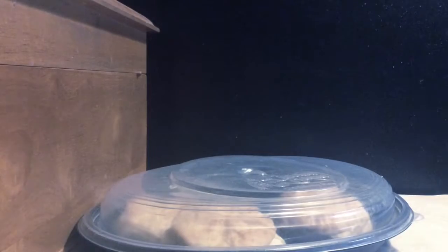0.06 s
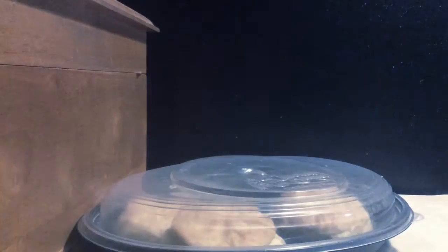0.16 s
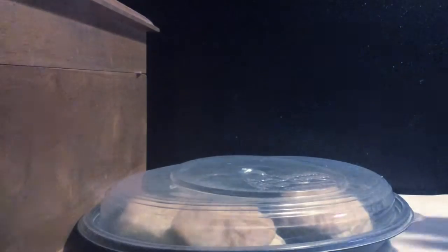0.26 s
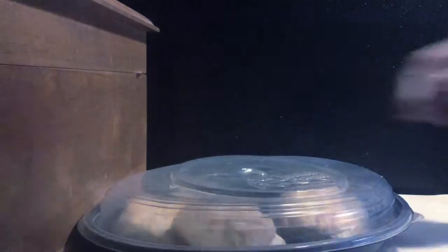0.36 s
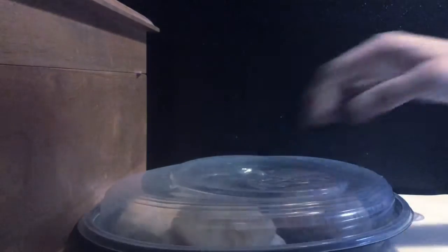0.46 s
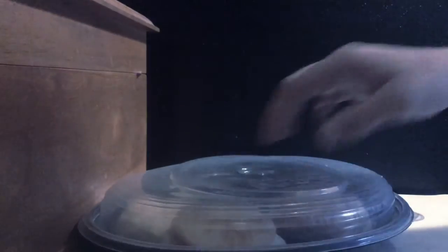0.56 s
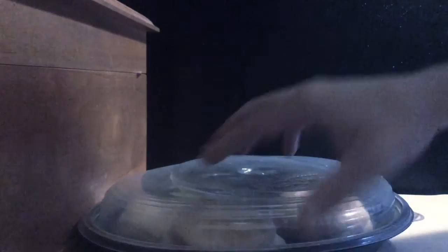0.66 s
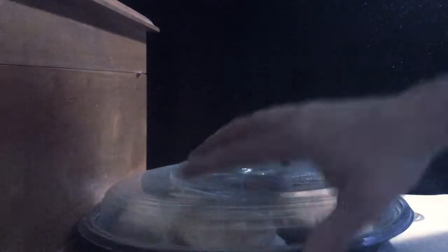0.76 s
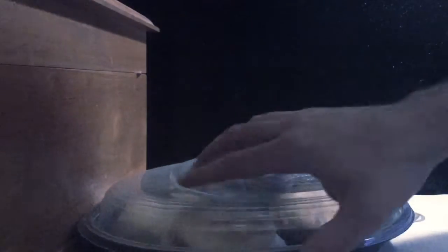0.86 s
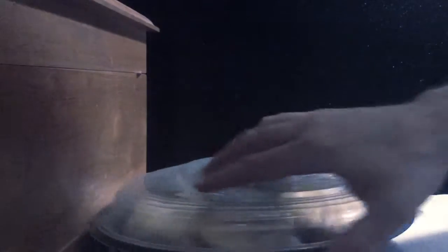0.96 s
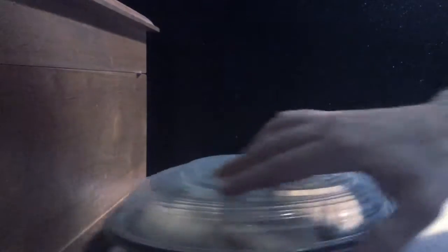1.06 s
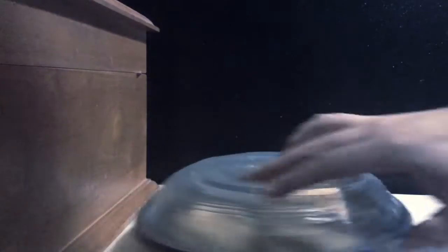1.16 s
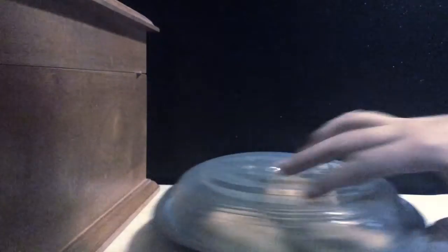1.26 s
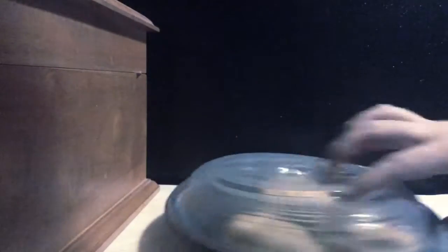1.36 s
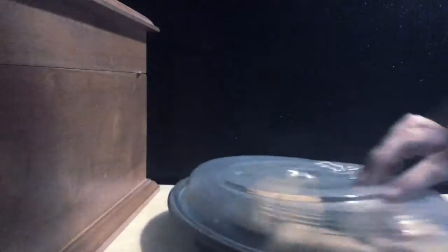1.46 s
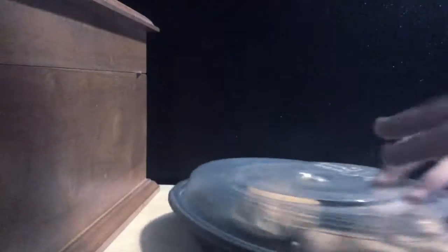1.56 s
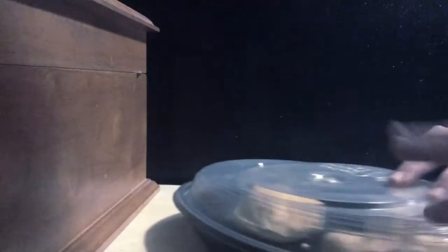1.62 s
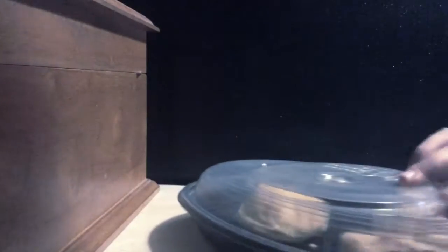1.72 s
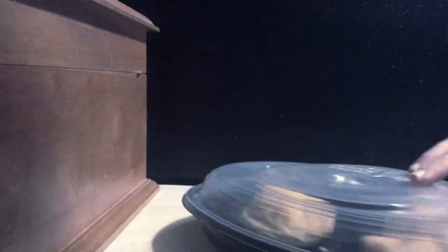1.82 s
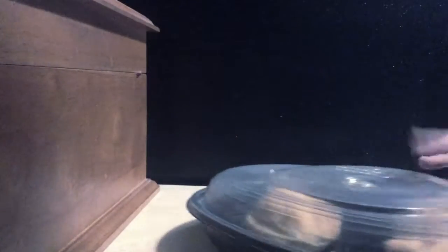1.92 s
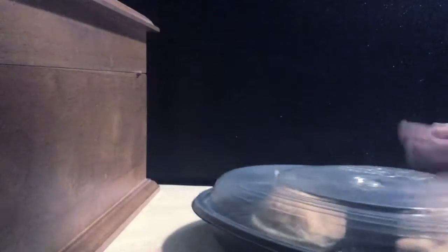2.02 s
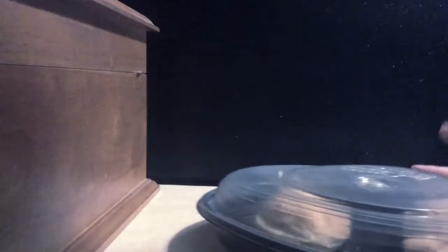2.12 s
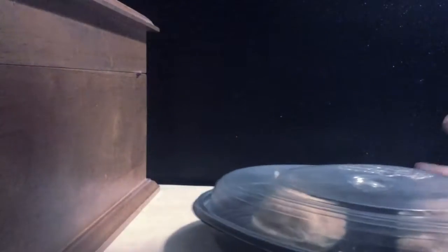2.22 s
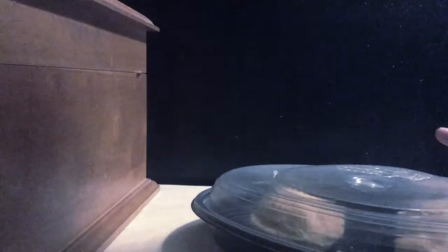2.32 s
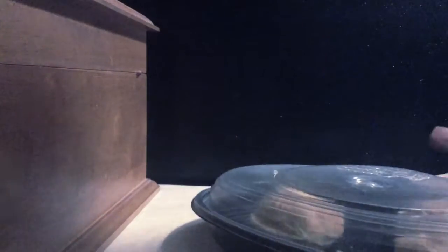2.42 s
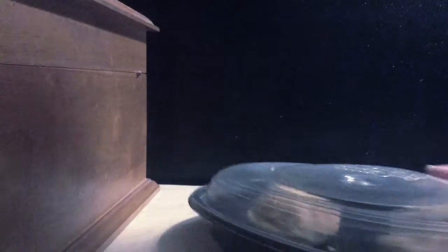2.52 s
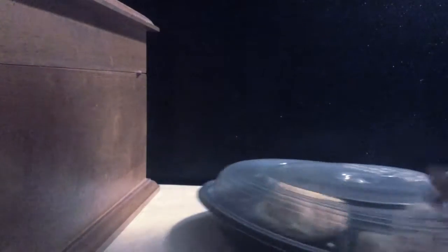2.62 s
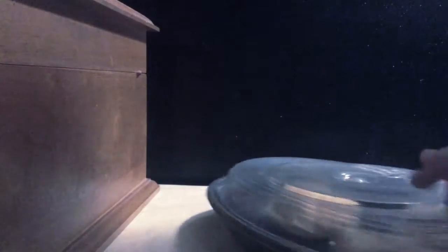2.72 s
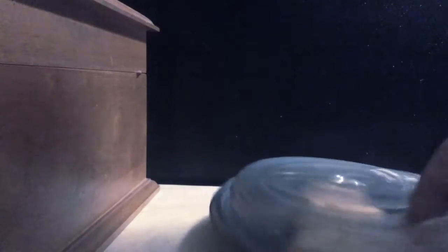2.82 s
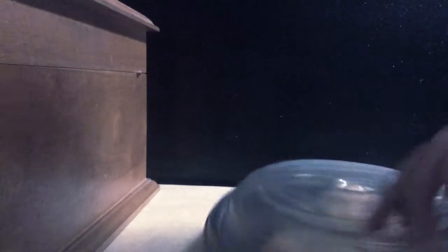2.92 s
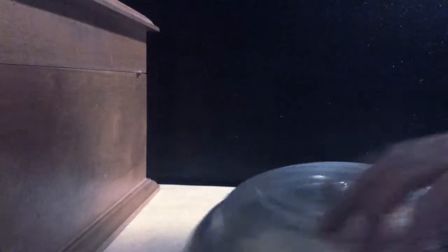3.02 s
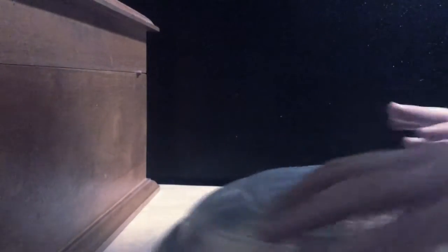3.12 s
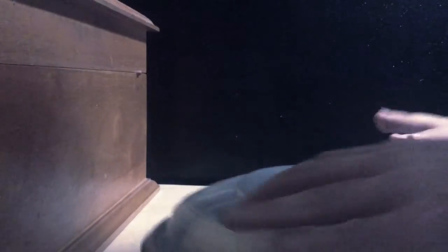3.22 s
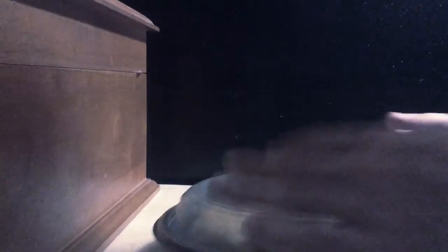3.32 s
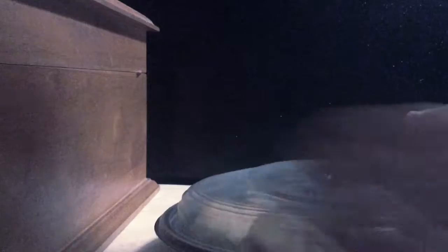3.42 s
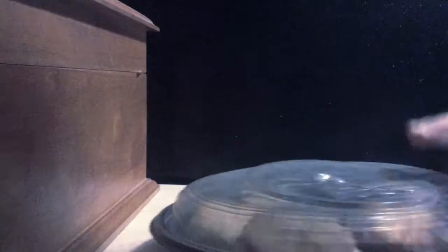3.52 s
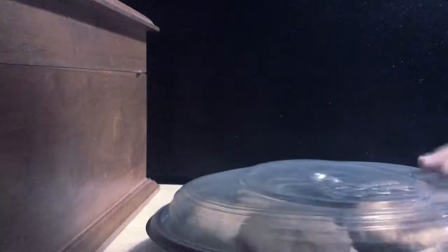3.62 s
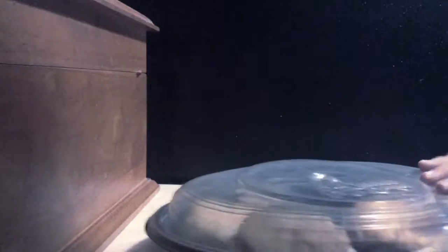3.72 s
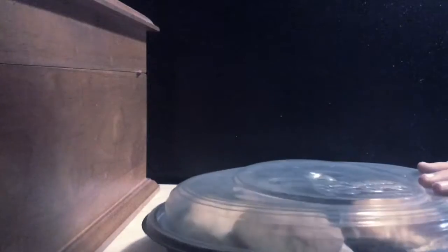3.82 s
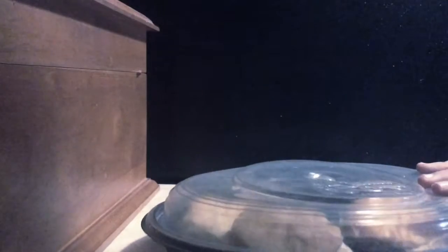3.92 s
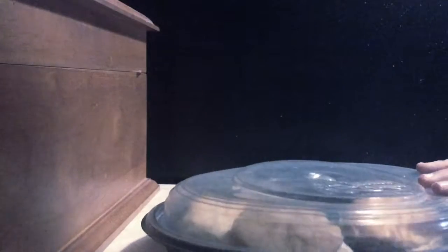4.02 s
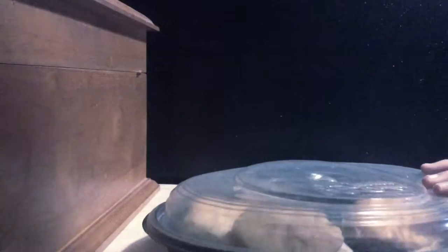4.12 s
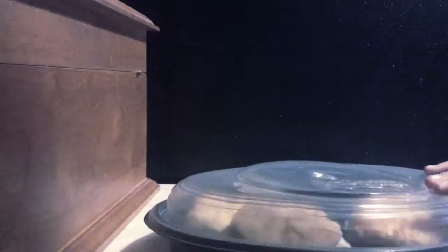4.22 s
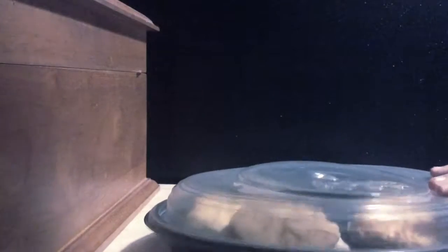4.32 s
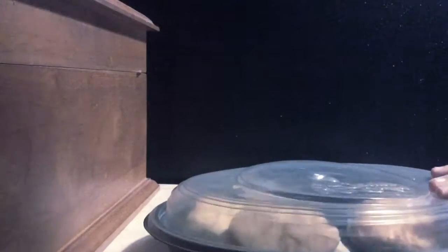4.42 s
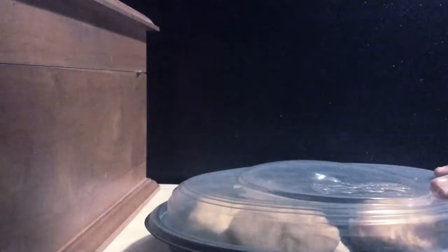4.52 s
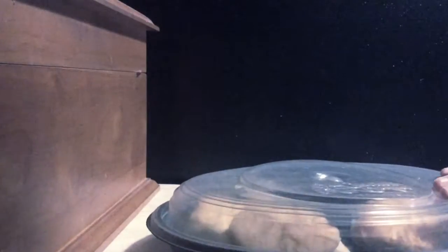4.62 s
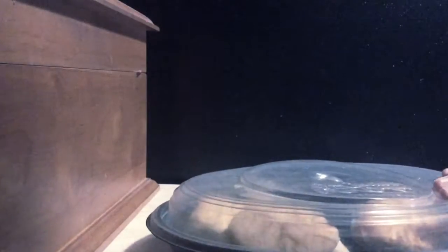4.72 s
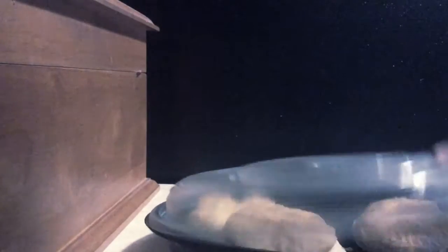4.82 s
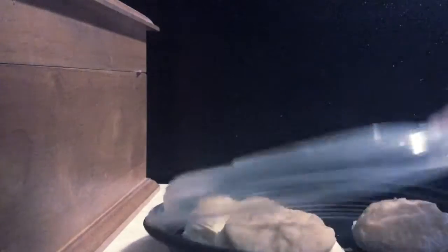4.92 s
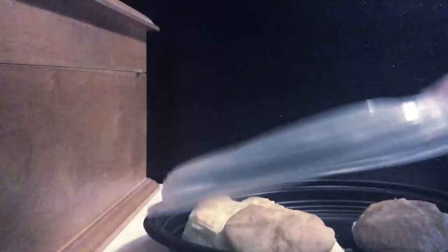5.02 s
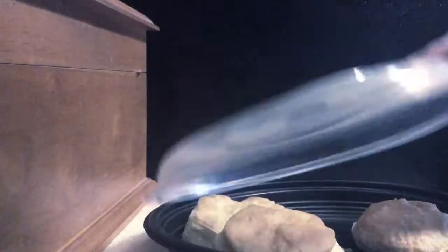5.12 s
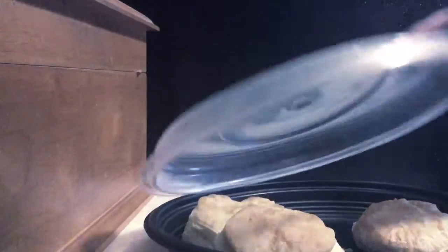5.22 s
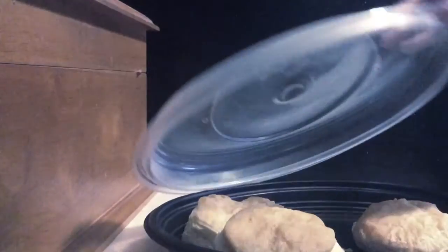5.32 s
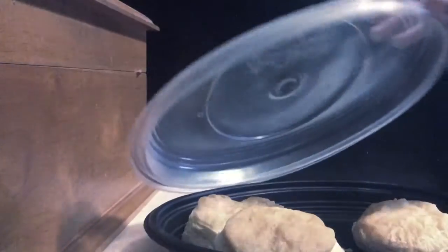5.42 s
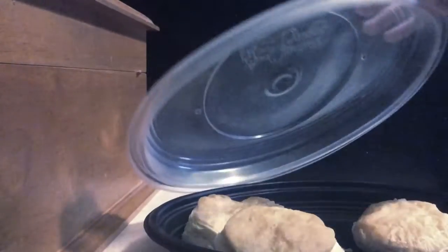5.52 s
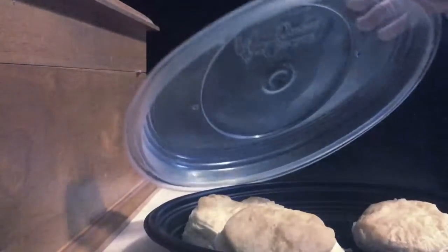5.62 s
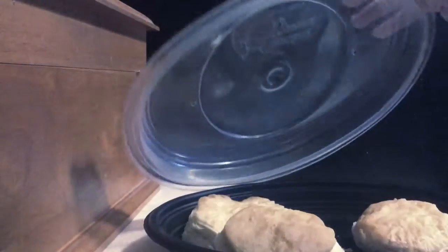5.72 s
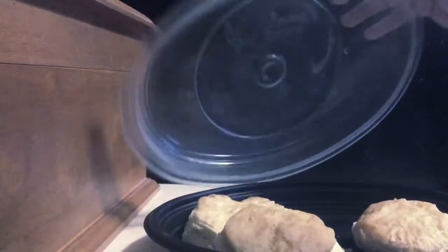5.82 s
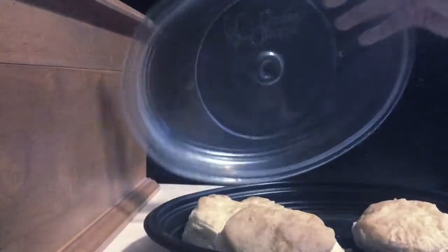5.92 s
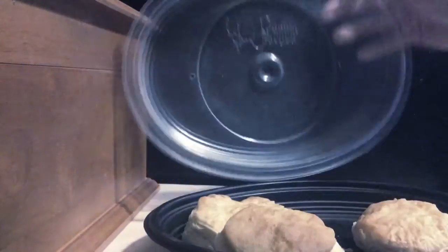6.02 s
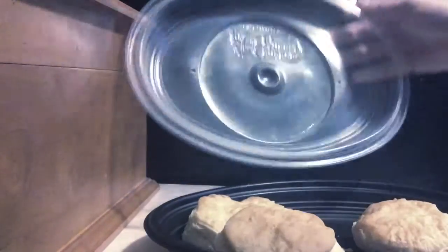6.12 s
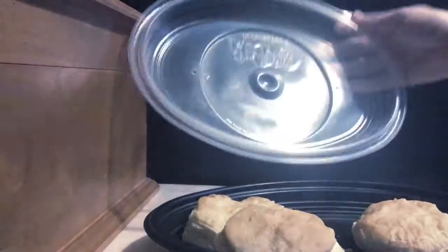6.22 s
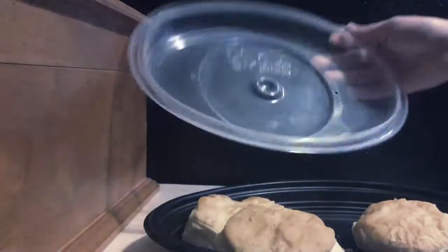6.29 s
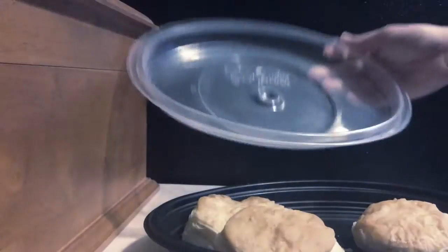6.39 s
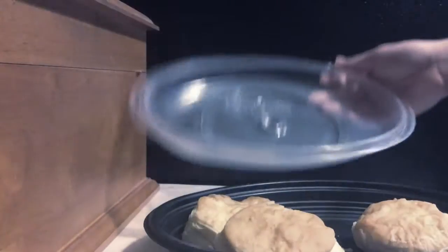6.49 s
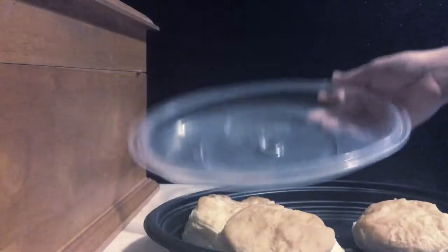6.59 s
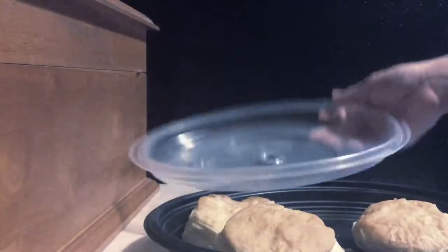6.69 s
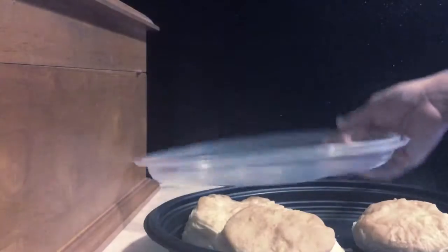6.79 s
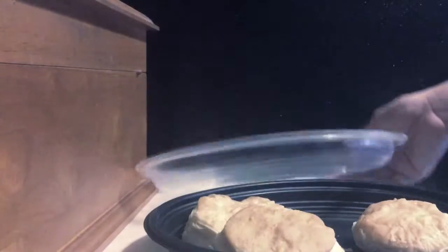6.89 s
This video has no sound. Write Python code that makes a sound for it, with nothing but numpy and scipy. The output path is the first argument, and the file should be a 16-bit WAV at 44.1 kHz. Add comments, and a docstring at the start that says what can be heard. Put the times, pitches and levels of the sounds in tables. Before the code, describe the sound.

A thin plastic tray with a dome lid slides and scrapes over a worktop, knocks and clicks, then pops open above a low room hum.

```python
"""On a worktop in a quiet humming room, close to the microphone: a plastic tray with a thin dome lid.
It is slid about and prised open. Sliding and rubbing are random micro-slips: they hiss in the treble
and shake the plastic's resonances below. The buckling dome knocks as a bank of decaying modes,
creases and rim tick as short cracks of noise, and the bumped board thumps at two low modes.
The hum is noise gathered in low room resonances; a short dull reverberation follows the hits."""
import sys
import numpy as np
from scipy import signal
from scipy.fft import rfft, irfft, next_fast_len
from scipy.io import wavfile

SR = 44100
rng = np.random.default_rng(int(sys.argv[2]) if len(sys.argv) > 2 else 0)


def generate_wav(signal):
    """Clip the signal to [-1, 1] and save it as 16-bit WAV at the path in sys.argv[1]."""
    frames = np.transpose(np.atleast_2d(signal))
    scaled = np.clip(frames, -1, 1) * 32767
    pcm = np.round(scaled).astype(np.int16)
    wavfile.write(sys.argv[1], SR, pcm)


N = 306495  # samples

# Levels are those of the sources, ahead of room and microphone.
# room resonances in the hum: [f/Hz, width of the first of two passes/Hz, rms level/dB]
HUM_RESONANCES = [(59, 12, -71.5), (105.2, 9.8, -67), (152.8, 6.5, -66.5), (169.5, 15.5, -64),
                  (193.5, 36, -70.5), (220.5, 10.3, -63), (346.8, 35, -71.5), (430.5, 22, -75),
                  (1550, 140, -81.5)]
# spectrum of the room's air noise: [f/Hz, relative level/dB]
AIR_SPECTRUM = [(15, -52), (25, -31), (46, -38), (107, -4), (130, -12.5), (159, -7), (218, 0), (266, -26),
                (340, -16.5), (700, -22.5), (1300, -34.5), (2500, -42.5), (9000, -46), (12500, -48.5),
                (15600, -65)]
# the worktop is bumped: [t/s, peak level/dB, f/Hz, t60/s, deep mode relative to the other/dB]
BOARD_THUMPS = [(0.848, -45.5, 161, 0.17, -11), (2.553, -36.5, 162, 0.048, -14),
                (3.163, -42, 111, 0.055, -20), (4.846, -34, 156, 0.068, -7),
                (6.665, -34.5, 104, 0.19, -6.5)]
# faint rustle of the hand between strokes: [t/s, hiss level/dB]
HAND_RUSTLE = [(0, -91), (0.2, -89), (0.43, -80), (0.64, -96), (0.8, -88), (4.7, -93), (5.1, -92),
               (5.58, -77.5), (5.75, -82), (6.0, -84), (6.15, -83), (6.3, -93), (6.55, -95), (6.62, -86),
               (6.95, -92)]
# short brushes of fingers and catches of the slide:
# [peak t/s, rise/s, fall/s, hiss level/dB, mid scrape level/dB, dome rumble level/dB]
FINGER_BRUSHES = [(0.182, .015, .08, -93, -74.5, -73), (0.288, 0.023, .12, -80, -68.5, -70),
                  (0.374, .1, 0.1, -80, -71, -79), (0.88, .04, .06, -80, -73, -57),
                  (1.626, 0.056, 0.19, -56, -59.5, -70), (1.952, 0.14, 0.063, -59.5, -60, -59),
                  (2.222, 0.18, 0.037, -72, -64, -63), (2.3, 0.1, 0.031, -67, -63.5, -59),
                  (2.446, .1, 0.12, -76.5, -79, -64), (2.876, .03, 0.074, -47, -57, -63),
                  (2.946, 0.048, 0.041, -47.5, -50.5, -74), (3.31, 0.052, 0.092, -44.5, -62, -69),
                  (3.568, 0.044, 0.077, -61.5, -67.5, -61), (3.618, 0.018, 0.039, -56.5, -55.5, -60),
                  (3.68, .08, .04, -86, -88, -57.5), (3.725, .015, 0.13, -95, -84, -52.5),
                  (3.811, 0.058, 0.053, -61, -56, -62), (3.92, .015, .03, -75, -65, -60),
                  (4.0, 0.046, 0.41, -74, -75, -65), (4.12, 0.22, 0.18, -71.5, -72, -66),
                  (4.254, 0.17, 0.17, -76, -70, -63), (4.378, .04, .11, -77, -78, -62),
                  (4.546, 0.18, 0.26, -84, -76.5, -75), (4.872, 0.052, 0.16, -56, -73, -67),
                  (4.968, 0.087, 0.033, -70, -76, -49.5), (4.992, 0.072, 0.051, -60.5, -63, -80),
                  (5.084, 0.031, .11, -71.5, -73, -64.5), (5.224, 0.091, .06, -65.5, -65.5, -55.5),
                  (5.33, .03, 0.11, -92, -76, -66), (5.414, 0.054, 0.26, -79, -74, -61),
                  (6.026, 0.03, 0.021, -60, -65.5, -59.5), (6.2, .1, 0.21, -80, -77, -72),
                  (6.312, .015, 0.061, -88, -78, -68), (6.8, 0.11, 0.13, -78, -74.5, -68),
                  (6.945, 0.022, .1, -70, -62, -62)]
# the tray is slid over the worktop twice, one list a slide:
# [t/s, hiss level/dB, dome rumble level/dB, tray base ring level/dB]
TRAY_SLIDES = [
    [(0.918, -82, -70, -84), (0.964, -65, -62, -66), (1.052, -57.5, -66, -63), (1.19, -51, -59, -61.5),
     (1.424, -61.5, -61.5, -69), (1.5, -62, -62, -58), (1.6, -66.5, -66, -60.5), (1.742, -65, -65.5, -63.5),
     (1.86, -68, -64, -67.5), (2.03, -62.5, -68, -67), (2.085, -77, -66, -68), (2.2, -90, -70, -75)],
    [(2.5, -75, -72, -68), (2.54, -69, -76, -67), (2.552, -58.5, -67, -55), (2.7, -64.5, -63, -68.5),
     (2.73, -60.5, -67, -61.5), (2.854, -57, -59, -64.5), (3.0, -54, -62, -61.5), (3.088, -56, -54, -64),
     (3.135, -60.5, -58.5, -63.5), (3.178, -52.5, -58, -63), (3.24, -56.5, -56.5, -66.5),
     (3.376, -60.5, -58.5, -65), (3.46, -68, -66, -73), (3.51, -88, -67, -81)],
]
# spectrum of the treble hiss of rubbing: [f/Hz, relative level/dB]
HISS_SPECTRUM = [(2060, -8.5), (3500, -13.5), (3870, -10), (4350, -7.5), (6800, -9.5), (8500, -3.5),
                 (11400, -13.5), (14600, -20.5), (15400, -18)]
# spectrum of the mid scrape of rubbing: [f/Hz, relative level/dB]
SCRAPE_SPECTRUM = [(680, -25), (1150, -8), (1310, -7), (1600, 3.5), (2060, 1.5), (3860, -2.5),
                   (4530, -11.5), (5000, -4), (6500, -13), (11000, -120)]
# the lid's rim scrapes briefly on wood: [peak t/s, rise/s, fall/s, level/dB]
RIM_SCUFFS = [(6.648, 0.0085, .05, -33), (6.661, 0.015, 0.022, -32.5), (6.708, 0.033, 0.015, -46)]
# the rim is prised out of its groove in crunches:
# [peak t/s, rise/s, fall/s, low modes level/dB, upper modes level/dB]
RIM_CRUNCHES = [(4.787, .005, .1, -46.5, -68), (4.815, .03, .03, -40.5, -53),
                (4.846, 0.015, 0.044, -34.5, -44.5), (4.876, .03, .012, -38, -62),
                (4.9, .02, .06, -43, -49), (4.925, 0.028, 0.023, -43, -56), (4.989, 0.02, 0.034, -38, -53)]
# bright ticks of creases and the rim:
# [t/s, peak level/dB, mid band over top band/dB, t60/s, air over top band/dB]
CREASE_TICKS = [(0.1764, -71, 5, 0.051, -16), (0.2867, -64.5, -1.5, 0.061, -24), (0.82, -71, 5, 0.046, -21),
                (0.835, -48.5, 7, 0.068, -20), (1.6127, -50, -6, 0.059, -19),
                (2.1161, -52.5, -2, 0.04, -22), (2.2877, -59, -10, 0.05, -13), (2.378, -68, -4, 0.04, -20),
                (2.4049, -67, 2, 0.04, -19), (2.5481, -41.5, 5, 0.04, -20), (2.8769, -50, 4, 0.07, -18),
                (2.9372, -48, -25, 0.058, -22), (3.0194, -52, -2, 0.054, -16),
                (3.1703, -42, -7, 0.044, -19), (3.6157, -47, 4, 0.055, -16), (3.7434, -56.5, 3, 0.04, -19),
                (3.7634, -67, 6, 0.056, -14), (3.8372, -49.5, 16, 0.045, -16),
                (3.9195, -57.5, -9, 0.06, -19), (4.0292, -31.5, -13, 0.074, -35),
                (4.0637, -31, 3, 0.047, -19), (4.2517, -58, -9, 0.044, -9), (4.2787, -39, -2, 0.053, -38),
                (4.8429, -36, -1, 0.14, -20), (4.9861, -45.5, -21, 0.12, -20), (5.3328, -72, -6, 0.04, -15),
                (5.3697, -57.5, -3, 0.057, -23), (5.3852, -60, -11, 0.04, -21),
                (5.4394, -67, -7, 0.049, -16), (5.4829, -55, 7, 0.024, -3), (5.5049, -43, -17, 0.044, -14),
                (5.5353, -46.5, -1, 0.036, -1), (5.899, -41, -1, 0.042, -15),
                (6.0252, -49.5, -20, 0.04, -23), (6.1654, -44.5, -13, 0.073, -29),
                (6.3131, -62, 12, 0.04, -22), (6.7755, -43.5, 2, 0.033, -24), (6.9366, -66, 6, 0.034, -20)]
# spectrum of ticks and scuffs: [f/Hz, relative level/dB]
TICK_SPECTRUM = [(710, -39), (1200, -25), (2070, -16.5), (2760, -17), (3350, -13), (4810, -12.5),
                 (6490, -4), (11900, -17), (14500, -21), (15400, -51)]
# the dome buckles or knocks:
# [t/s, peak level/dB, favoured f/Hz, mean t60 of the modes/s, contact/ms, tilt/(dB per octave)]
DOME_KNOCKS = [(0.82, -44, 460, 0.045, 2.16, -19), (0.835, -36.5, 420, 0.015, 2.23, 12),
               (0.861, -41, 434, 0.022, 1.95, -17), (1.119, -52, 560, 0.04, 0.88, -1.5),
               (1.821, -48.5, 523, 0.046, 2.6, -16), (2.115, -47, 384, 0.033, 1.4, 3),
               (2.285, -46.5, 415, 0.04, 0.91, 7), (2.377, -46, 1100, 0.023, 0.92, 5),
               (2.404, -50, 1070, 0.025, 1.74, 1), (2.528, -50, 347, 0.047, 1.6, -9),
               (2.549, -37.5, 360, 0.018, 1.7, -1), (2.688, -47, 440, 0.04, 1.65, -1.5),
               (2.729, -29, 1040, 0.018, 2.4, -2.5), (2.778, -38.5, 364, 0.015, 1.15, -13),
               (2.876, -40.5, 1030, 0.032, 2.1, 18), (2.908, -55, 1020, 0.033, 0.64, 5),
               (2.936, -38, 467, 0.042, 1.03, -14), (2.964, -43.5, 1050, 0.032, 1.5, 15),
               (2.995, -45, 420, 0.029, 0.93, -10), (3.019, -41.5, 477, 0.068, 2.1, 6),
               (3.053, -40, 467, 0.028, 1.05, -9), (3.065, -34.5, 425, 0.012, 1.55, -26),
               (3.106, -38, 520, 0.041, 1.27, -8), (3.171, -35, 504, 0.04, 1.06, -7),
               (3.622, -39, 1020, 0.025, 1.17, -2), (3.664, -51, 410, 0.027, 1.15, -5),
               (3.718, -44, 515, 0.025, 0.71, -17), (3.741, -52, 409, 0.029, 1.5, 13),
               (3.763, -50, 634, 0.02, 0.96, 8), (3.917, -47, 440, 0.03, 1.1, 15),
               (4.028, -19.5, 471, 0.035, 0.71, 6), (4.063, -28.5, 540, 0.024, 1.62, 5.5),
               (4.077, -37, 947, 0.024, 0.78, -6), (4.249, -53, 533, 0.029, 1.1, 4),
               (4.278, -29, 623, 0.027, 1.79, -7), (4.385, -51, 424, 0.052, 0.67, -11),
               (4.784, -44, 426, 0.023, 1.5, 4), (4.847, -21, 439, 0.021, 0.86, 3),
               (4.862, -23, 516, 0.027, 0.71, 2), (4.876, -27, 431, 0.011, 1.03, 2),
               (4.984, -31.5, 655, 0.065, 0.8, -6), (5.007, -49, 646, 0.04, 0.81, 0),
               (5.369, -52.5, 337, 0.07, 2.34, 5), (5.505, -41, 720, 0.023, 1.65, 19.5),
               (5.534, -42.5, 1540, 0.027, 1.4, -2.5), (5.901, -50.5, 307, 0.026, 0.85, -3),
               (6.167, -48, 1590, 0.073, 0.76, 6), (6.67, -24, 342, 0.032, 1.2, 3),
               (6.684, -37, 334, 0.035, 1.5, -22), (6.702, -41, 356, 0.029, 1.2, -10),
               (6.715, -42, 845, 0.03, 1.03, 26), (6.775, -47, 1640, 0.04, 1.2, 15)]
# modes of the plastic: [f/Hz, relative level/dB, relative t60 (each sound scales the decay)]
PLASTIC_MODES = [(344, -3.5, 0.043), (418.6, 1, 0.074), (475.8, 5, 0.043), (516.4, 2.5, 0.0238),
                 (661.7, -1, 0.061), (729, 5, 0.056), (827, -1.5, 0.066), (910.5, 1, 0.05), (1043, 4, 0.04),
                 (1122, -19, 0.013), (1555, 5, 0.022), (1665, -18.5, 0.04), (2177, 0, 0.013),
                 (2160, -49, 0.032), (2880, -40.5, 0.017), (3120, -61.5, 0.012), (3500, -33, 0.013)]

AIR_DB = -63  # rms
BOARD_DEEP_HZ = 86
RUSTLE_SCRAPE_DB, RUSTLE_DOME_DB, RUSTLE_BASE_DB = -85.5, -76.5, -83.5
BRUSH_BASE_SHARE, BRUSH_BASE_DB = 0.68, -2  # base ring: share that follows the scrape (rest: dome), offset
SLIDE_SCRAPE_SHARE, SLIDE_SCRAPE_DB = 0.53, 0.5  # scrape: share that follows the hiss (rest: base), offset
STROKE_DROP_DB = 20  # how far a stroke is down one fall after its peak, or one soft rise before it
ROOM_T60_S, ROOM_DB, WALL_HZ = 0.2, -15.5, 5960
MIC_LOW_HZ, CUTOFF_HZ = 39.3, 15820


def from_db(db):
    """Gain of a level in dB."""
    return 10 ** (np.asarray(db) / 20)


def rms_one(x):
    """Scaled to unit rms."""
    return x / np.sqrt(np.mean(x ** 2) + 1e-20)


def in_time(rows):
    """Columns of a curve, interpolated at every sample."""
    s, *columns = np.transpose(rows)
    return [np.interp(np.arange(N) / SR, s, c) for c in columns]


def coloured(x, points):
    """A spectrum laid on a noise; rms 1."""
    hz, db = np.transpose(points)
    size = next_fast_len(len(x))
    bins = np.fft.rfftfreq(size, 1 / SR) + 1e-3  # keeps the logarithm finite at 0 Hz
    gain = from_db(np.interp(np.log(bins), np.log(hz), db, left=-120, right=-120))
    return rms_one(irfft(rfft(x, size) * gain, size)[:len(x)])


def resonance(x, hz, width_hz):
    """Two-pole band-pass with a gain of about 1 on top."""
    r = np.exp(-np.pi * width_hz / SR)
    forward = [(1 - r * r) / 2, 0, (r * r - 1) / 2]
    feedback = [1, -2 * r * np.cos(2 * np.pi * hz / SR), r * r]
    return signal.lfilter(forward, feedback, x)


def flicker(rate_hz):
    """Noise through two equal low-passes: slow random wavering, rms 1."""
    r = np.exp(-2 * np.pi * rate_hz / SR)
    wavering = signal.lfilter([1], [1, -2 * r, r * r], rng.standard_normal(N + SR))
    return rms_one(wavering[SR:])  # without the filter's first second


def grains(per_s, spread_db):
    """Random micro-slips of uneven size, as single-sample impulses."""
    sizes = from_db(spread_db * np.minimum(rng.exponential(1, N), 4)) * rng.standard_normal(N)
    return sizes * (rng.random(N) < per_s / SR)


def add(out, s, burst, peak_db):
    """Lays a burst into out at a time, with a given peak."""
    at = round(s * SR)
    burst = burst[:N - at]
    out[at:at + len(burst)] += from_db(peak_db) * burst / np.max(np.abs(burst))


def soft(early):
    """A stroke that swells gradually; early is the time before its peak, in rises."""
    return from_db(-STROKE_DROP_DB * early)


def sudden(early):
    """A stroke that starts from silence one rise before its peak."""
    return np.maximum(1 - early, 0)


def strokes(rows, onset):
    """Gain of each level column: strokes set in, peak and fade; they add up in power."""
    t = np.arange(0, N + 16, 16) / SR  # every 16 samples, interpolated below
    s, rise_s, fall_s, *levels = np.transpose(rows)[:, :, None]
    early = np.maximum((s - t) / rise_s, 0)
    late = np.maximum((t - s) / fall_s, 0)
    shape = onset(early) * from_db(-STROKE_DROP_DB * late)
    gains = [np.sqrt(np.sum((shape * from_db(db)) ** 2, axis=0)) for db in levels]
    return [np.interp(np.arange(N) / SR, t, gain) for gain in gains]


def shaken(modes, slips, damping):
    """Slips heard through some of the modes, widened by the grip of the hand; rms 1."""
    total = 0
    for k, (hz, db, t60) in enumerate(modes):
        total = total + (-1) ** k * from_db(db) * resonance(slips, hz, damping / t60)
    return rms_one(total)


def patchy(x, low_hz, high_hz, patchy_db):
    """Five broad bands swell and sink on their own as the contact spot wanders."""
    edges = np.geomspace(low_hz, high_hz, num=6)
    change = 0
    for edge in zip(edges, edges[1:]):
        band = signal.sosfilt(signal.butter(1, edge, "band", fs=SR, output="sos"), x)
        change = change + band * (from_db(patchy_db * flicker(3.03)) - 1)
    return x + change


def room_tone():
    """Broad air noise, with the hum gathered in the room's low resonances."""
    hum = 0
    for hz, width_hz, db in HUM_RESONANCES:
        once = resonance(rng.standard_normal(N + SR), hz, width_hz)
        twice = resonance(once, hz, 3 * width_hz)[SR:]
        hum = hum + from_db(db) * rms_one(twice)
    return hum + from_db(AIR_DB) * coloured(rng.standard_normal(N), AIR_SPECTRUM)


def room(x):
    """Short dull reverberation: decaying noise after a 4 ms gap."""
    t = np.arange(SR // 2) / SR
    tail = rng.standard_normal(len(t)) * from_db(-60 * t / ROOM_T60_S) * (t > .004)
    tail = signal.sosfilt(signal.butter(1, WALL_HZ, fs=SR, output="sos"), tail)
    return signal.fftconvolve(x, tail / np.sqrt(np.sum(tail ** 2)))[:N]


def thumps():
    """Two low modes of the board, pushed softly, so the onset is rounded."""
    out, t = np.zeros(N), np.arange(SR // 2) / SR
    for s, peak_db, hz, t60, deep_db in BOARD_THUMPS:
        modes = np.sin(2 * np.pi * hz * t) + from_db(deep_db) * np.sin(2 * np.pi * BOARD_DEEP_HZ * t)
        push = 1 - np.exp(-t / 0.0042)
        add(out, s, modes * from_db(-60 * t / t60) * push, peak_db)
    return out


def slide_levels():
    """Hiss, scrape, dome and base gains of the slides; at -120 dB outside them."""
    rows = []
    for slide in TRAY_SLIDES:
        before = (slide[0][0] - .02, -120, -120, -120)
        after = (slide[-1][0] + .04, -120, -120, -120)
        rows += [before, *slide, after]
    hiss_db, dome_db, base_db = in_time(rows)
    scrape_db = SLIDE_SCRAPE_SHARE * hiss_db + (1 - SLIDE_SCRAPE_SHARE) * base_db + SLIDE_SCRAPE_DB
    return from_db([hiss_db, scrape_db, dome_db, base_db])


def friction():
    """Slides, brushes and rustle added in power, as gains of hiss, scrape, dome and base."""
    brushes = []
    for row in FINGER_BRUSHES:
        scrape_db, dome_db = row[4], row[5]
        base_db = BRUSH_BASE_SHARE * scrape_db + (1 - BRUSH_BASE_SHARE) * dome_db + BRUSH_BASE_DB
        brushes.append((*row, base_db))
    hiss_db, = in_time(HAND_RUSTLE)
    steady = np.zeros(N)
    rustle = from_db([hiss_db, steady + RUSTLE_SCRAPE_DB, steady + RUSTLE_DOME_DB, steady + RUSTLE_BASE_DB])
    return np.sqrt(slide_levels() ** 2 + np.square(strokes(brushes, soft)) + rustle ** 2)


def rubbing():
    """Fine slips hiss in the treble and shake the plastic's modes below."""
    hiss_gain, scrape_gain, dome_gain, base_gain = friction()
    stick = flicker(34.0)  # shared, so hiss and scrape waver together
    hiss = rms_one(patchy(coloured(grains(9000., 0.65), HISS_SPECTRUM), 2020, 22000, 3.34))
    hiss = hiss * hiss_gain * from_db(0.47 * stick)
    scrape = rms_one(patchy(coloured(grains(5000., 0.58), SCRAPE_SPECTRUM), 700, 6900, 2.34))
    scrape = scrape * scrape_gain * from_db(0.42 * stick)
    dome = shaken(PLASTIC_MODES[:5], grains(1500., 2.6), damping=4.75)
    dome = dome * dome_gain * from_db(1.6 * flicker(20.0))
    base = shaken(PLASTIC_MODES[6:10], grains(3000., 2.8), damping=5.2)
    base = base * base_gain * from_db(0.82 * flicker(25.0))
    return hiss + scrape + dome + base


def scuff():
    """Dense bright slips of the rim on wood, under short strokes."""
    gain, = strokes(RIM_SCUFFS, sudden)
    return coloured(grains(14000., 1.5), TICK_SPECTRUM) * gain


def prising():
    """Dense slips of the rim shake all the dome's modes."""
    low_gain, upper_gain = strokes(RIM_CRUNCHES, sudden)
    slips = grains(4000., 0.54)
    dull = signal.butter(2, 2500, fs=SR, output="sos")
    upper = signal.sosfilt(dull, shaken(PLASTIC_MODES[5:], slips, damping=4.1))
    low = shaken(PLASTIC_MODES[:5], slips, damping=5.75)
    return low * low_gain + upper * upper_gain


def ticks():
    """Creases and rim: cracks of noise with a sharp first instant and a fast decay."""
    out, t = np.zeros(N), np.arange(SR // 6) / SR
    middle = signal.butter(2, [1800, 4500], "band", fs=SR, output="sos")
    dull = signal.butter(3, 9500, fs=SR, output="sos")
    airy = signal.butter(2, 9500, "high", fs=SR, output="sos")
    noises = rng.standard_normal((len(CREASE_TICKS), 3, len(t)))
    snap = from_db(-60 * t / 0.0074)  # the first instant
    for (s, peak_db, mid_db, t60, air_db), noise in zip(CREASE_TICKS, noises):
        top = signal.sosfilt(dull, coloured(noise[0], TICK_SPECTRUM))
        mid = from_db(mid_db) * rms_one(signal.sosfilt(middle, noise[1]))
        air = from_db(air_db) * rms_one(signal.sosfilt(airy, noise[2]))
        air = air * from_db(-60 * t / (0.53 * t60))  # the air dies sooner
        add(out, s, (top + mid) * (from_db(-60 * t / t60) + 0.32 * snap) + air, peak_db)
    return out


def knocks():
    """Each knock rings all modes, most those near the spot's own pitch, under a short crunch of contact."""
    out, t = np.zeros(N), np.arange(SR // 4) / SR
    hz, db, t60 = np.transpose(PLASTIC_MODES)[:, :, None]
    chances = rng.standard_normal((len(DOME_KNOCKS), 2, len(PLASTIC_MODES), 1))
    noises = rng.standard_normal((len(DOME_KNOCKS), len(t)))
    thin_shell = signal.butter(4, 290, "high", fs=SR, output="sos")  # the small dome radiates no bass
    for knock, chance, noise in zip(DOME_KNOCKS, chances, noises):
        s, peak_db, spot_hz, ring_s, contact_ms, tilt_db = knock
        near_db = 14.6 * np.exp(-(np.log2(hz / spot_hz) / 0.15) ** 2)
        uneven_db = 2.5 * chance[0]
        colour_db = db + near_db + uneven_db + tilt_db * np.log2(hz / 500)  # hard contact is brighter
        decay_db = -60 * t / (t60 * ring_s / np.mean(t60))
        modes = from_db(colour_db + decay_db) * np.sin(2 * np.pi * hz * t + 0.43 * chance[1])
        crunch = rms_one(resonance(resonance(noise, spot_hz, 920.0), spot_hz, 1330.0))
        crunch = crunch * from_db(colour_db.max() - 8.5 - 60 * t / ring_s)
        rise = (1 - np.exp(-1000 * t / contact_ms)) ** 2
        burst = signal.sosfilt(thin_shell, (modes.sum(axis=0) + crunch) * rise)
        add(out, s - contact_ms / 1000, burst, peak_db)  # starts one contact time early
    return out


def scene():
    """Lid and tray close by, in the humming room; only the hits and scrapes of the lid reverberate."""
    hits = knocks() + ticks() + scuff() + prising()
    return (hits + from_db(ROOM_DB) * room(hits) + thumps() + rubbing() + room_tone())[None]


def record(dry):
    """The microphone loses the deep bass; the top is cut steeply."""
    thin = signal.sosfilt(signal.butter(2, MIC_LOW_HZ, "highpass", fs=SR, output="sos"), dry)
    return signal.sosfilt(signal.cheby2(24, 60, CUTOFF_HZ, fs=SR, output="sos"), thin)


dry = scene()
out = record(dry)
generate_wav(out)
```